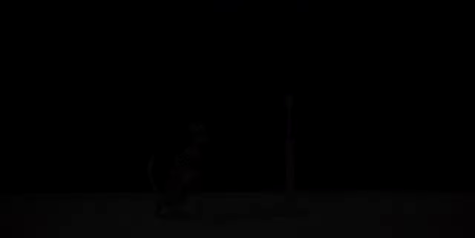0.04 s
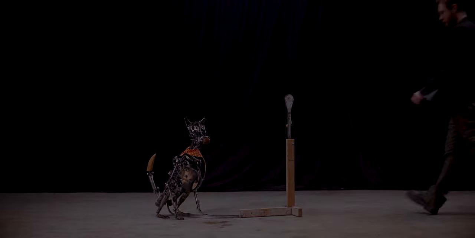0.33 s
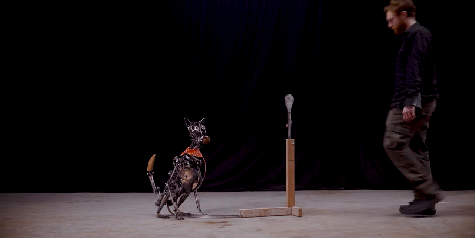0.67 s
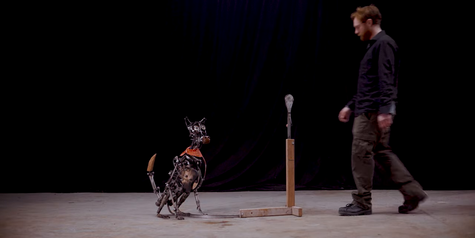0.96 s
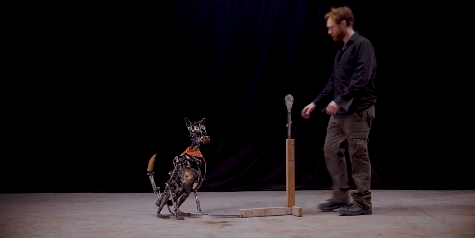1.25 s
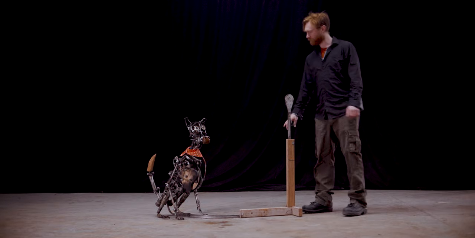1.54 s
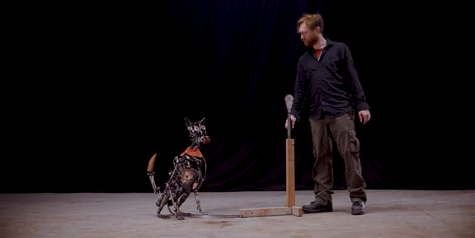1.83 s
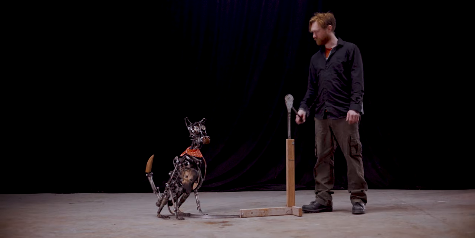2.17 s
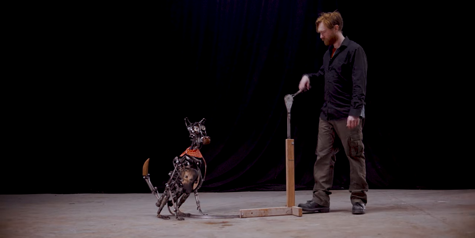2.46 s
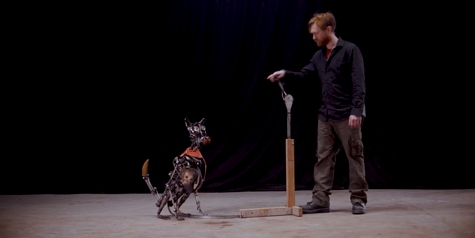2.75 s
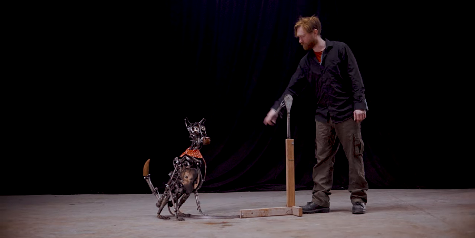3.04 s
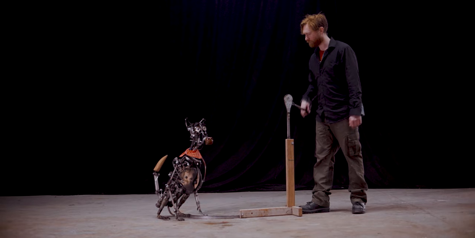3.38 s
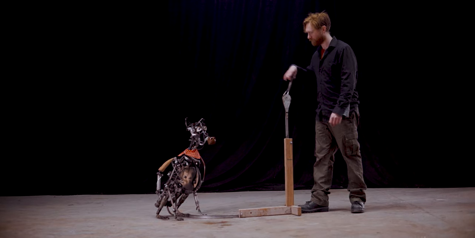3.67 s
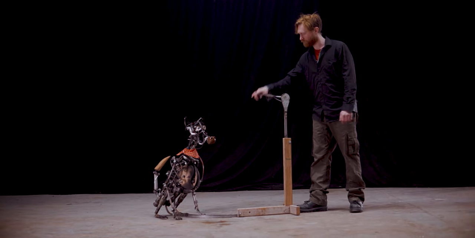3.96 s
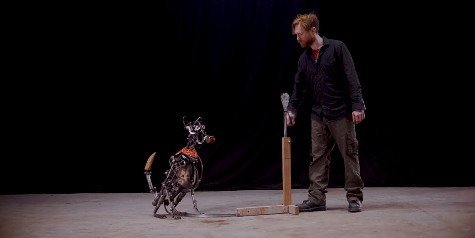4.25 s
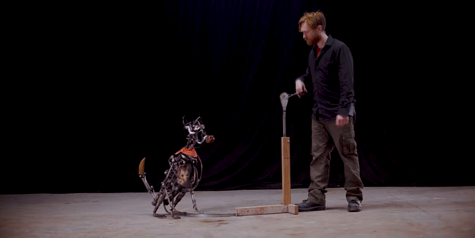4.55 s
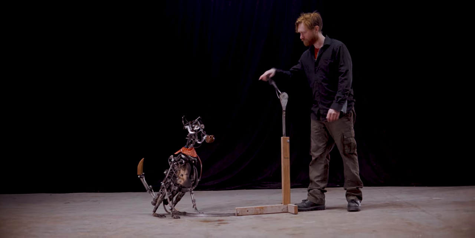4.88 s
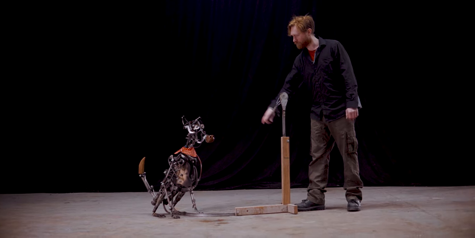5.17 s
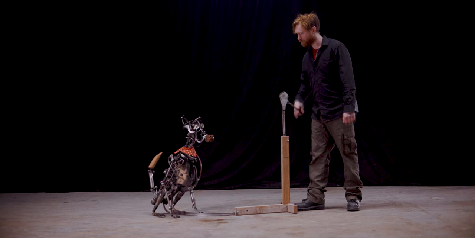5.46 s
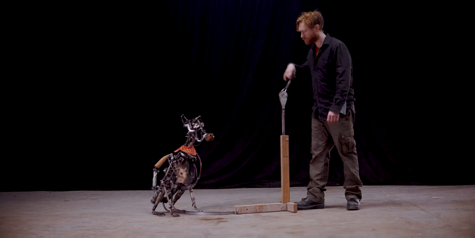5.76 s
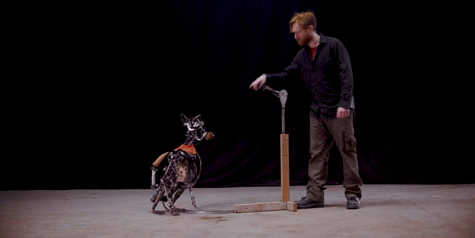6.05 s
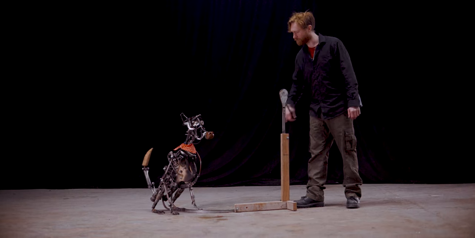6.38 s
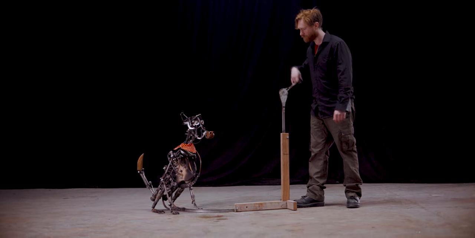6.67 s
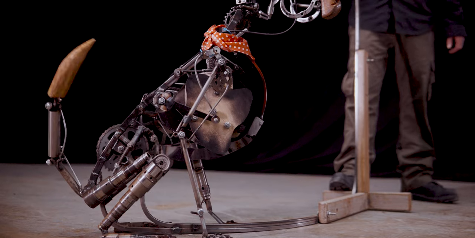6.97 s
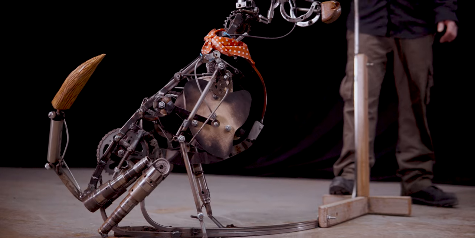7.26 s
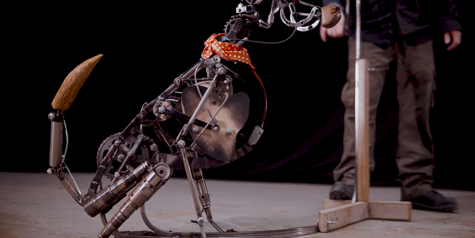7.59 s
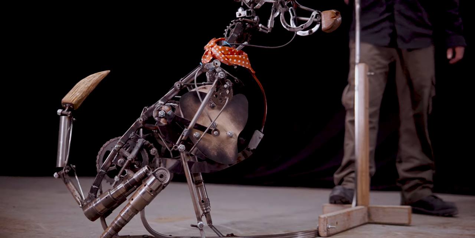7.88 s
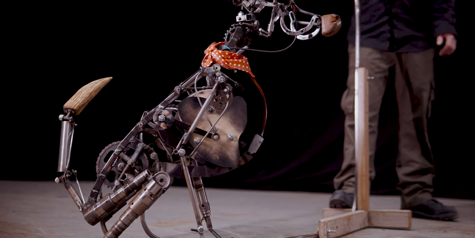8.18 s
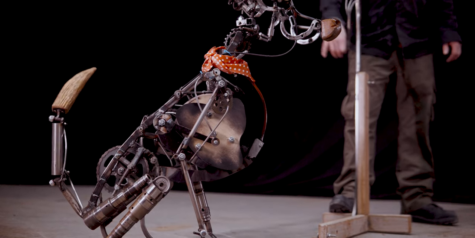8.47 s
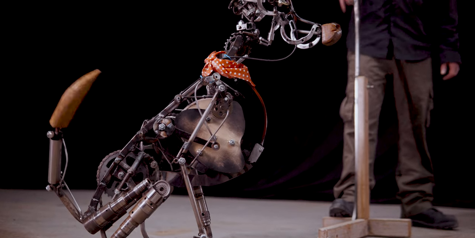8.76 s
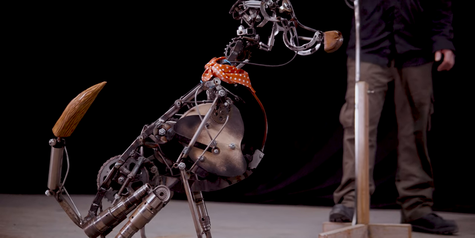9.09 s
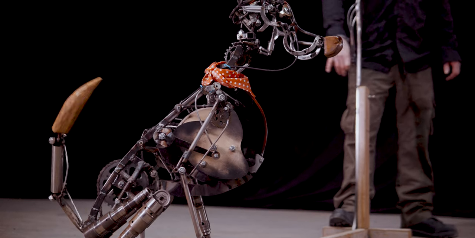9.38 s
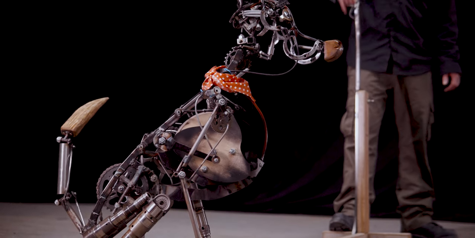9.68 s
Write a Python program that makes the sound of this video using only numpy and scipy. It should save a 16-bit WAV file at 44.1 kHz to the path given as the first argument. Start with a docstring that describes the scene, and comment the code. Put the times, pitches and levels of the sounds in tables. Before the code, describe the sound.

In a quiet studio with a low ventilation hum, a man takes a few soft steps on concrete, trousers brushing. A crank handle clinks, then a steel mechanical dog starts up: gears whirr, a ratchet ticks and loose links knock, surging with each push. The drive jolts and jingles, and a wooden post creaks. The microphone then jumps closer, where the machine is louder and deeper, and a lever lands with one hard crack.

```python
"""Over a studio's ventilation hum, a man crosses the concrete floor, shoes thudding, trousers brushing.
A crank handle clinks in his hand and a steel automaton starts up across the room: gears whirr, the frame
shudders, a pawl ticks over a ratchet and loose links knock, all surging with each push on the crank.
The drive jolts and jingles, and the crank's wooden post rocks and creaks. Near 7 s we cut in close,
where the ticks are drier and the frame deeper, and a lever drops on its stop with a hard crack."""
import sys
import numpy as np
from scipy import signal
from scipy.fft import rfft, irfft, next_fast_len
from scipy.io import wavfile

SR = 44100
rng = np.random.default_rng(int(sys.argv[2]) if len(sys.argv) > 2 else 0)


def generate_wav(sig):
    """Save sig (samples, or channels by samples) to the path in sys.argv[1] as 16-bit PCM at SR."""
    pcm = np.round(np.clip(np.atleast_2d(sig).T, -1, 1) * 32767).astype(np.int16)
    wavfile.write(sys.argv[1], SR, pcm)


N = 433503
TIME = np.arange(N) / SR
FFT_SIZE = next_fast_len(N + SR // 2, real=True) // 2 * 2
HZ = np.maximum(np.arange(FFT_SIZE // 2 + 1) * SR / FFT_SIZE, 1)

OPEN_S, CLOSE_S = .07, 6.866   # the sound opens; the cut from far to near
FAR, NEAR = TIME < CLOSE_S, TIME >= CLOSE_S
CUTOFF_HZ, USUAL_TEETH_PER_S = 15800, 20
# gain grows as this power of the crank's speed
TICK_SPEED_POWER, RATTLE_SPEED_POWER, SLIDE_SPEED_POWER = 0.68, 0.55, 1.19

# Cue levels are set ahead of each layer's mix gain.
# trousers brushing with each stride: t/s, level/dB
CLOTH_CUES = [(.07, -51.5), (.22, -54), (.53, -52.5), (1.0, -57), (1.5, -60)]
# shoes landing: t/s, level/dB
STEP_CUES = [(0.203, -50), (0.422, -42.5), (0.51, -36.5), (0.584, -48), (0.976, -37), (1.066, -52),
             (1.438, -36), (1.955, -51)]
# soles scraping the concrete: t/s, length/s, level/dB
SCUFF_CUES = [(0.21, 0.0092, -61), (0.428, .006, -60), (.482, 0.013, -53), (0.52, 0.009, -56),
              (0.935, 0.013, -51), (0.98, 0.0083, -55), (1.439, 0.0075, -50), (1.533, .008, -56),
              (1.572, 0.038, -55), (1.598, 0.026, -53.5)]
# the handle clinking: t/s, level/dB
CLINK_CUES = [(2, -38.5), (2.029, -37), (2.051, -42), (2.0734, -40), (2.1266, -47), (2.2424, -43)]
# load on the gear train, heard at the usual speed: t/s, tooth rattle/dB, sliding steel/dB
GEAR_LOAD = [(2.05, -66.5, -83), (2.45, -44, -46), (2.8, -46.5, -49), (3.08, -40.5, -39), (3.4, -45, -45.5),
             (4.4, -43, -44), (4.8, -43.5, -46.5), (5.2, -43, -44), (5.7, -48, -47.5), (6.3, -45.5, -45),
             (6.72, -48, -44.5), (6.9, -40.5, -41.5), (8.3, -40.5, -42.5), (9.1, -41.5, -42.5),
             (9.3, -38, -41.5), (9.83, -42.5, -44.5)]
# pushes on the crank, each taking the pawl over a run of teeth:
# start/s, end/s, teeth, first gap/middle gap, last gap/middle gap, tick level at the usual speed/dB
CRANK_PUSHES = [(2.392, 2.693, 5, 0.58, 0.72, -45), (2.827, 3.1329, 6, 1.05, 1.18, -40),
                (3.188, 3.636, 8, 0.93, 0.81, -36.5), (3.702, 4.224, 11, 1.27, 0.88, -36),
                (4.6062, 4.865, 5, 1.35, 1.7, -34.5), (4.9294, 5.2374, 7, 0.99, 0.88, -35.5),
                (5.2925, 5.741, 8, 0.94, 0.83, -36), (5.907, 6.159, 6, 0.73, 0.76, -35.5),
                (6.204, 6.431, 6, 1.07, 1.37, -32), (6.5507, 6.846, 6, 1.57, 1.5, -33.5),
                (6.887, 7.2896, 8, 0.87, 1, -29.5), (7.4007, 7.759, 9, 1.24, 1.6, -30),
                (7.807, 8.331, 11, 0.72, 0.91, -32), (8.4093, 8.6452, 7, 1.12, 1.29, -25.5),
                (8.676, 8.987, 6, 1.15, 1.32, -32.5), (9.0394, 9.401, 9, 1.7, 1.11, -30),
                (9.442, 9.721, 7, 1.05, 0.65, -30.5)]
# the pawl catching on a tooth and snapping down harder: t/s, level/dB
SNAP_CUES = [(2.8282, -34.5), (2.9408, -32), (3.1846, -32), (3.77, -31), (3.9994, -32), (4.1404, -31),
             (4.18, -32.5), (4.985, -31), (5.425, -35), (5.6225, -31.5), (6.6164, -32), (6.715, -29),
             (6.9423, -24.5), (7.0017, -27), (7.3989, -27.5), (7.4915, -22.5), (7.6567, -24.5),
             (7.855, -26), (7.953, -25), (8.114, -31.5), (8.2783, -26), (8.325, -27.5), (9.098, -27),
             (9.2, -26.5), (9.4894, -28.5), (9.59, -28)]
# the hardest knocks of loose links taking up their play, and a bright tick of the pawl at # 6.869 s: t/s,
# level/dB
KNOCK_CUES = [(4.4227, -30), (4.8557, -31), (6.621, -27.5), (6.794, -23.5), (6.869, -23.5), (7.107, -28),
              (7.3972, -26), (7.7944, -34), (7.9806, -25), (8.041, -27), (8.26, -29), (8.4384, -29),
              (9.021, -27.5), (9.1315, -25), (9.226, -26)]
# jolts of the drive, and at 8.83 s the bright clash of the lever landing: t/s, clash/dB, # afterjingle/dB,
# shaft ring/dB
JOLT_CUES = [(4.2963, -28, -40, -35), (4.39, -31, -45, -36.5), (4.418, -43, -36, -36),
             (5.802, -25.5, -32.5, -53), (8.832, -32, -34, -43)]
# the post rocking on its foot: t/s, level/dB
BUMP_CUES = [(4.369, -35.5), (5.803, -39)]
# bouts of stick-slip in the post: start/s, length/s, level/dB
CREAK_CUES = [(4.663, 0.36, -46.5), (5.427, 0.087, -41.5), (6.359, 0.084, -42), (6.545, 0.063, -45)]
# the lever meeting its stop: t/s, level/dB
LEVER_CUES = [(8.8311, -16), (8.8327, -9.5)]

# tone colour of the room and the man: f/Hz, level/dB
ROOM_TONE = [(12, -42), (20, -5), (91, 0), (146, -5), (277, -8), (434, -16), (624, -14), (759, -20),
             (849, -16.5), (1810, -24.5), (1960, -25), (5080, -32), (6180, -32.5), (14700, -35),
             (16000, -33)]
CLOTH_TONE = [(120, 6), (300, 5.5), (700, -2.5), (1500, -5), (3000, -11), (6200, -15), (15000, -24)]
STEP_TONE = [(50, -44), (130, 3), (190, 7), (290, 2.5), (450, -16.5), (900, -27), (2200, -19), (6000, -65),
             (15000, -58)]
SCUFF_TONE = [(300, -22), (850, -8), (1200, -17), (1850, 0), (2400, -4), (3100, -5), (4000, -17.5),
              (6200, -18), (9000, -29), (15000, -21)]
# tone colour of the running machine, far and near: f/Hz, level/dB
GEAR_TONE_FAR = [(290, -40.5), (500, -14), (1020, -14.5), (1280, -5.5), (1770, -8), (2260, -1.5),
                 (3810, -7), (6230, -4.5), (7420, -10), (9220, -10), (11100, -21), (15100, -22.5),
                 (16000, -39)]
GEAR_TONE_NEAR = [(290, -23), (500, -5.5), (1000, -11), (1570, -1.5), (1790, -8), (2570, 2), (3340, -4.5),
                  (6140, -3), (7530, -9.5), (8700, -9.5), (9920, -17.5), (15100, -16), (16000, -32)]
FRAME_TONE_FAR = [(60, -26), (130, -4.5), (220, -7.5), (310, -1), (400, -12.5), (520, -16), (800, -6.5),
                  (1600, -29)]
FRAME_TONE_NEAR = [(25, -24), (50, -7.5), (75, 1.5), (120, 0.5), (220, -0.5), (380, -8), (520, -7),
                   (800, -15.5), (1600, -34)]
TICK_TONE_FAR = [(400, -15), (1500, -10), (2300, 5.5), (3800, -2), (5500, 5), (7000, 1.5), (9000, -4),
                 (11000, -7), (15500, -11)]
TICK_TONE_NEAR = [(400, -20.5), (1500, -12), (2300, -22.5), (4000, 0), (5500, 3.5), (7000, -1), (9000, -4),
                  (11000, -5), (15500, -8.5)]
# tone colour of the steel and wood accents: f/Hz, level/dB
KNOCK_TONE = [(400, -20), (1100, -16.5), (1600, -16.5), (2200, 5.5), (2800, 1), (3600, -5.5), (6000, -10),
              (15000, -23)]
JOLT_TONE = [(300, -36), (1000, -1), (2500, 6.5), (5000, 5.5), (7000, 6.5), (10000, 3), (15500, -1.5)]
BUMP_TONE = [(90, -4), (190, -9), (260, 2), (330, -3.5), (500, -15), (850, -8.5), (1200, -49), (3000, -58)]
CREAK_TONE = [(150, -38), (330, -8), (430, -0.5), (560, -0.5), (750, -19), (1500, -60)]
LEVER_TONE = [(200, -17), (650, -20), (1000, -8), (1400, -14), (2000, -8), (2600, -8), (3250, -5),
              (3800, -11), (7000, -14), (15000, -19)]
# steel resonances on top of a tone colour: f/Hz, width/Hz, boost or cut/dB
STEEL_MODES_FAR = [(1280, 42, 2), (2196, 170, 4.5), (2830, 89, 2), (2930, 51, 6.5), (4700, 87, -10),
                   (4980, 64, 6), (5400, 90, 4.5), (6300, 130, 1.5), (8400, 50, 3), (9230, 270, 5),
                   (11980, 280, 8), (15400, 110, 7)]
STEEL_MODES_NEAR = [(1610, 95, 6.9), (1870, 130, 5.6), (2157, 120, 9), (2600, 260, 4.6), (3780, 240, 2.2),
                    (4740, 21, 2.8), (5290, 63, 1.3), (6500, 75, 3.4), (8800, 71, 1.8), (8900, 80, 1.7),
                    (9200, 170, 5.5), (10150, 140, 5.6), (12500, 120, 6.1), (15400, 150, 4)]
LOOSE_STEEL_MODES = [(1310, 70, 4.3), (2420, 120, 3.3), (4320, 300, 3.7), (5500, 80, 3.7), (9300, 180, 9.1),
                     (12000, 150, 4.7), (15200, 250, 5.5)]
# clear pings of struck steel: f/Hz, level/dB, t60/s
PAWL_PINGS_FAR = [(5020, -12, 0.035), (5310, -7.5, 0.032), (6090, -2.5, 0.032), (8570, -17, 0.07)]
PAWL_PINGS_NEAR = [(4760, -20, 0.1), (6220, -0.5, 0.041), (8534, -4.5, 0.048), (14300, -31, .08)]
SHAFT_PINGS = [(850, -16.5, 0.23), (1270, -4, 0.078), (5590, -2, 0.085), (8600, -16, .08), (12200, -3, .09),
               (15330, -2, .06), (15560, -7, .05)]
LEVER_PINGS = [(1020, -19, .04), (1840, -3, 0.05), (2490, -12, 0.053), (2970, -0.5, 0.02),
               (3420, -4, 0.025), (6400, -21, 0.23), (9000, -16, 0.17)]
# stereo width: f/Hz, side over mid/dB
STEREO_ROOM = [(60, -37), (110, -19.5), (200, -17), (380, -9), (700, -5.5), (1290, -2), (2380, -1.5),
               (4400, 1.5), (8120, -1), (15000, 0)]
STEREO_FAR = [(60, -24), (110, -16), (200, -12), (380, -9), (700, -9), (1290, -4.5), (2380, -9), (4400, -2),
              (8120, -2), (15000, 0)]
STEREO_NEAR = [(60, -34), (110, -34), (200, -19), (380, -16), (700, -8.5), (1290, -7), (2380, -10),
               (4400, -3.5), (8120, 2.5), (15000, 1)]


def from_db(db):
    """Decibels to gain."""
    return 10 ** (np.asarray(db) / 20)


def gain_per_hz(points):
    """An EQ curve joined by straight lines on a log-frequency axis."""
    hz, db = np.transpose(points)
    return from_db(np.interp(np.log(HZ), np.log(hz), db))


def body(tone, modes=()):
    """An object's response, of unit power: a broad tone colour with ringing resonances on top."""
    gain = gain_per_hz(tone) / np.sqrt(1 + (HZ / CUTOFF_HZ) ** 20)
    for hz, width, db in modes:
        gain = gain * np.sqrt(1 + (from_db(db) ** 2 - 1) / (1 + (2 * (HZ - hz) / width) ** 2))
    cepstrum = irfft(np.log(gain / np.sqrt(np.mean(gain ** 2))))
    cepstrum[1:FFT_SIZE // 2] *= 2   # folding gives minimum phase: nothing rings before the blow
    cepstrum[FFT_SIZE // 2 + 1:] = 0
    return np.exp(rfft(cepstrum))


def radiate(force, response, width, pan_db=0, reflection_s=.0031):
    """Mid and side forces sound a body in stereo; the side's treble is partly an early reflection."""
    treble = HZ / np.hypot(HZ, 2500)
    direct, diffuse = rfft(force, FFT_SIZE) * response
    reflected = direct * np.exp(-2j * np.pi * HZ * reflection_s)
    ambience = reflected * treble / np.sqrt(2) + diffuse * np.sqrt(1 - treble ** 2 / 2)
    mid, side = irfft([direct, ambience * gain_per_hz(width)])[:, :N]
    return np.array([mid + side, mid - side]) * from_db([[pan_db / 2], [-pan_db / 2]])


def noise():
    """Two unrelated white noises."""
    return rng.standard_normal((2, N))


def impulses(times, sizes):
    """A one-sample spike for each hit."""
    out = np.zeros(N)
    np.add.at(out, np.clip(np.round(np.asarray(times) * SR).astype(int), 0, N - 1), sizes)
    return out


def fade(power, t60):
    """Energy of blows dying away."""
    return signal.lfilter([1], [1, -from_db(-120 / (t60 * SR))], power + 1e-18)


def smear(power, t60):
    """The same energy spread out in time, softening the attack."""
    return fade(power, t60) * (1 - from_db(-120 / (t60 * SR)))


def contacts(per_s, spread_db, t60):
    """Grain: the energy of tiny random contacts of uneven strength, with mean 1."""
    strength = from_db(spread_db * np.clip(rng.standard_normal(N), -2, 2)) ** 2
    power = fade(strength * (rng.random(N) < per_s / SR), t60)
    return power / power.mean()


def thud(cues, tail_db, tail_t60):
    """One push for each cue (t/s, level/dB), followed by the room's tail."""
    times, db = np.transpose(cues)
    push = impulses(times, from_db(db))
    return push + from_db(tail_db) * noise() * np.sqrt(fade(push ** 2, tail_t60))


def chatter(power, t60, tail_db, tail_t60):
    """Steel on steel: a short burst of tiny contacts, then the weaker shiver of frame and room."""
    return noise() * np.sqrt(fade(power, t60) + from_db(tail_db) ** 2 * fade(power, tail_t60))


def ring(times, levels_db, pings):
    """Blows ring as damped sines; strength, tuning and damping vary with the seating of the parts."""
    out = np.zeros((2, N + SR))
    age = np.arange(SR // 5) / SR
    for t, blow_db in zip(times, levels_db):
        start = int(t * SR)
        for hz, ping_db, t60 in pings:
            size_db, detune, damping_db = rng.standard_normal(3) * [1.5, .002, 1.8]
            # left and right agree less in the treble
            phase = 2 * np.pi * (rng.random() + rng.standard_normal((2, 1)) * hz / SR)
            envelope = from_db(blow_db + ping_db + size_db - 60 * age / t60 * from_db(damping_db))
            sine = np.sin(2 * np.pi * hz * (1 + detune) * age + phase)
            out[:, start:start + len(age)] += envelope * sine
    return out[:, :N]


def ventilation():
    """The bed: steady ventilation rumble with a low hum and faint hiss."""
    return from_db(-55) * radiate(noise(), body(ROOM_TONE, [(89.0, 15, 4.6)]), STEREO_ROOM)


def trousers(rise_db_per_s=57, fall_db_per_s=41):
    """Cloth brushes: it swells as a leg swings and dies away after the foot lands."""
    strides = [from_db(db - np.maximum(rise_db_per_s * (t - TIME), fall_db_per_s * (TIME - t)))
               for t, db in CLOTH_CUES]
    return radiate(noise() * np.max(strides, axis=0), body(CLOTH_TONE), STEREO_ROOM)


def footsteps():
    """Shoes thud softly on concrete, and sand catches under the scraping soles."""
    thuds = radiate(thud(STEP_CUES, tail_db=-39.5, tail_t60=1.0), body(STEP_TONE), STEREO_ROOM)
    scrape = sum(from_db(db) ** 2 * np.exp(-(2 * (TIME - t) / length) ** 2)
                 for t, length, db in SCUFF_CUES)
    reverb = from_db(-1.0) ** 2 * smear(scrape, t60=0.89)
    sand = contacts(per_s=450, spread_db=3.0, t60=0.008)
    soles = radiate(noise() * np.sqrt(scrape * sand + reverb), body(SCUFF_TONE), STEREO_ROOM)
    return from_db(24.0) * thuds + soles


def handle():
    """The handle clinks lightly as the hand takes it up."""
    times, db = np.transpose(CLINK_CUES)
    force = chatter(impulses(times, from_db(db) ** 2), t60=0.026, tail_db=-14, tail_t60=.3)
    return from_db(-12.0) * radiate(force, body(TICK_TONE_FAR, STEEL_MODES_FAR), STEREO_FAR)


def crank_teeth():
    """The hand speeds up and slows on every turn. For each tooth: t/s, speed/usual, push level/dB."""
    runs = []
    for start, end, count, first_gap, last_gap, db in CRANK_PUSHES:
        gaps = np.interp(np.linspace(0, 1, round(count) - 1), [0, .5, 1], [first_gap, 1, last_gap])
        times = start + (end - start) * np.r_[0, np.cumsum(gaps)] / gaps.sum()
        speed = 1 / (np.gradient(times) * USUAL_TEETH_PER_S)
        runs.append([times, speed, np.full(len(times), db)])
    return np.hstack(runs)


def gear_load():
    """Gain envelopes of rattle and slide under load, silent until the gears start."""
    times, *levels_db = np.transpose(GEAR_LOAD)
    return [from_db(np.interp(TIME, times, db)) * (TIME >= times[0]) for db in levels_db]


def gear_force(mesh, smooth, rattle_db, slide_db, crossover_hz=3700):
    """Meshing teeth rattle in the mids, sliding faces add bright grain; both rise with load and speed."""
    tooth_times, tooth_speed, _ = crank_teeth()
    speed = np.interp(TIME, tooth_times, tooth_speed)
    rattle_load, slide_load = gear_load()
    rattle_gain = rattle_load * speed ** RATTLE_SPEED_POWER * from_db(rattle_db)
    slide_gain = slide_load * speed ** SLIDE_SPEED_POWER * from_db(slide_db)
    grit = contacts(per_s=280, spread_db=10.0, t60=0.01)
    rattle = noise() * rattle_gain * np.sqrt(smooth + (1 - smooth) * mesh)
    slide = noise() * slide_gain * np.sqrt(smooth + (1 - smooth) * (mesh + grit) / 2)
    lowpass = signal.butter(4, crossover_hz, "low", fs=SR, output="sos")
    highpass = signal.butter(4, crossover_hz, "high", fs=SR, output="sos")
    return signal.sosfilt(lowpass, rattle) + signal.sosfilt(highpass, slide)


def gears():
    """Tooth contacts set the steel gear train whirring, far and then near."""
    far_mesh = contacts(per_s=260, spread_db=-1.0, t60=0.031)
    far = FAR * gear_force(far_mesh, smooth=0.37, rattle_db=2.5, slide_db=0.5)
    near_mesh = contacts(per_s=220, spread_db=8.5, t60=0.03)
    near = NEAR * gear_force(near_mesh, smooth=0.6, rattle_db=2.5, slide_db=4.5)
    return (radiate(far, body(GEAR_TONE_FAR, STEEL_MODES_FAR), STEREO_FAR, pan_db=-1.3)
            + radiate(near, body(GEAR_TONE_NEAR, STEEL_MODES_NEAR), STEREO_NEAR, pan_db=-2.5))


def frame():
    """The low end: the running machine shudders with the load on its gears."""
    load, _ = gear_load()
    force = noise() * load * np.sqrt(contacts(per_s=300, spread_db=0.0, t60=0.075))
    return (from_db(-13.5) * radiate(force * FAR, body(FRAME_TONE_FAR), STEREO_FAR)
            + from_db(-8.0) * radiate(force * NEAR, body(FRAME_TONE_NEAR), STEREO_NEAR))


def pawl_falls():
    """Time and level of each tick: louder at speed, with a hard snap where the pawl catches."""
    times, speed, push_db = crank_teeth()
    wear_db = 1.5 * rng.uniform(-1.16, 1, len(times))   # no two teeth are worn alike
    db = push_db + TICK_SPEED_POWER * 20 * np.log10(speed) + wear_db
    for snap_time, snap_db in SNAP_CUES:
        tooth = np.argmin(abs(times - snap_time))
        times[tooth], db[tooth] = snap_time, snap_db
    return times, db


def ratchet(bounce_db=-10.5):
    """The pawl slides off each tooth, snaps down, pings and bounces once; up close it is drier."""
    times, db = pawl_falls()
    bounces = times + rng.uniform(.003, .005, len(times))
    power = impulses(times, from_db(db) ** 2) + impulses(bounces, from_db(db + bounce_db) ** 2)
    landing = smear(power, t60=.014)
    roomy = chatter(landing * FAR, t60=.024, tail_db=-16.0, tail_t60=0.35)
    tight = chatter(landing * NEAR, t60=.025, tail_db=-18.0, tail_t60=0.3)
    far = radiate(roomy, body(TICK_TONE_FAR, STEEL_MODES_FAR), STEREO_FAR, pan_db=-2.5)
    near = radiate(tight, body(TICK_TONE_NEAR, STEEL_MODES_NEAR), STEREO_NEAR, pan_db=-0.5)
    close = times >= CLOSE_S
    pings = ring(times[~close], db[~close], PAWL_PINGS_FAR)
    pings += ring(times[close], db[close], PAWL_PINGS_NEAR)
    return from_db(0.5) * far + from_db(-0.83) * near + pings * from_db([[-1.2], [1.2]])


def links(chance_far=.92, chance_near=.5):
    """Slack joints knock, duller and shorter than the pawl: a few hard, many lightly between teeth."""
    hard_times, hard_db = np.transpose(KNOCK_CUES)
    hard_power = impulses(hard_times, from_db(hard_db) ** 2)
    tooth_times, speed, _ = crank_teeth()
    luck, lag, strength = rng.random((len(tooth_times), 3)).T
    struck = luck < np.where(tooth_times < CLOSE_S, chance_far, chance_near)
    over_load_db = 10 + 0.5 * (2 * strength - 1)
    light_times = tooth_times + lag / (speed * USUAL_TEETH_PER_S)
    load, _ = gear_load()
    light = load * impulses(light_times, struck * from_db(over_load_db))
    force = chatter(hard_power + light ** 2, t60=0.021, tail_db=-12.5, tail_t60=0.065)
    return from_db(-2.0) * radiate(force, body(KNOCK_TONE), STEREO_FAR, pan_db=2.5)


def jolts():
    """The drive jolts: all the loose steel clashes and jingles on, while the shaft rings; the last cue is the
    bright clash of the lever landing on its stop."""
    times, clash_db, jingle_db, ring_db = np.transpose(JOLT_CUES)
    clash = fade(impulses(times, from_db(clash_db) ** 2), t60=0.06)
    jingle = fade(impulses(times, from_db(jingle_db) ** 2), t60=0.67)
    force = noise() * np.sqrt(smear(clash + jingle, t60=0.021))
    parts = radiate(force, body(JOLT_TONE, LOOSE_STEEL_MODES), STEREO_FAR, pan_db=-2.5)
    return from_db(-2.0) * parts + ring(times, ring_db, SHAFT_PINGS)


def post(slip_gap_s=.024, jitter_s=0.00415, spread_db=4.5):
    """Pushed by the crank, the wooden post rocks on its foot and creaks in uneven runs of slips."""
    slips = np.array([(t, db) for start, length, db in CREAK_CUES
                      for t in np.arange(start, start + length, slip_gap_s)])
    slips += rng.standard_normal(slips.shape) * [jitter_s, spread_db]
    creaks = radiate(thud(slips, tail_db=-32.0, tail_t60=0.15), body(CREAK_TONE), STEREO_ROOM)
    bumps = radiate(thud(BUMP_CUES, tail_db=-29.5, tail_t60=0.81), body(BUMP_TONE), STEREO_ROOM)
    return from_db(15.5) * creaks + from_db(18.5) * bumps


def lever():
    """A lever grazes its stop, then lands with a hard crack and a short ring."""
    times, db = np.transpose(LEVER_CUES)
    force = chatter(impulses(times, from_db(db) ** 2), t60=0.0065, tail_db=-13, tail_t60=0.2)
    crack = radiate(force, body(LEVER_TONE), STEREO_NEAR, pan_db=-1.5)
    return from_db(-5.5) * crack + from_db(-4.5) * ring(times[-1:], db[-1:], LEVER_PINGS)


def scene():
    """The mix: room, man and machine."""
    return (ventilation() + trousers() + footsteps()
            + handle() + gears() + frame() + ratchet() + links() + jolts() + post() + lever())


def record(dry):
    """A quick fade-in after a moment of silence, and a steep cut off the top."""
    fade_in = np.clip((TIME - OPEN_S) / .005, 0, 1)
    high_cut = signal.ellip(10, .1, 80, CUTOFF_HZ, fs=SR, output="sos")
    return signal.sosfilt(high_cut, dry * fade_in)


dry = scene()
out = record(dry)
generate_wav(out)
```